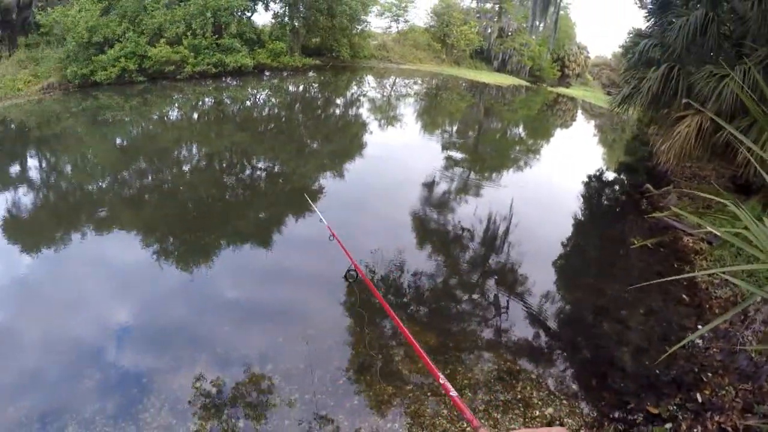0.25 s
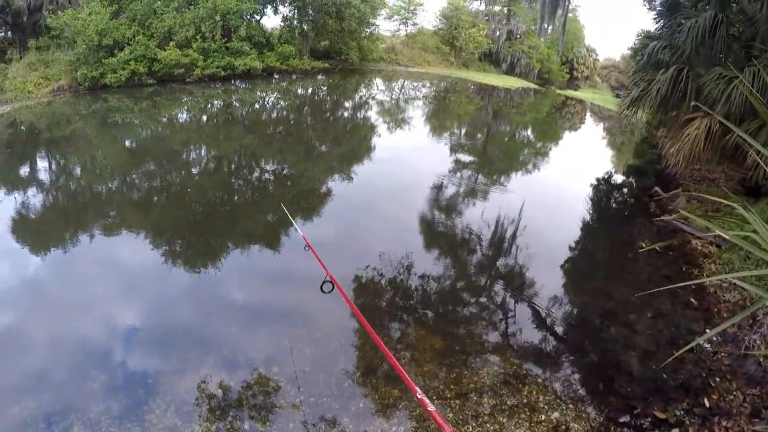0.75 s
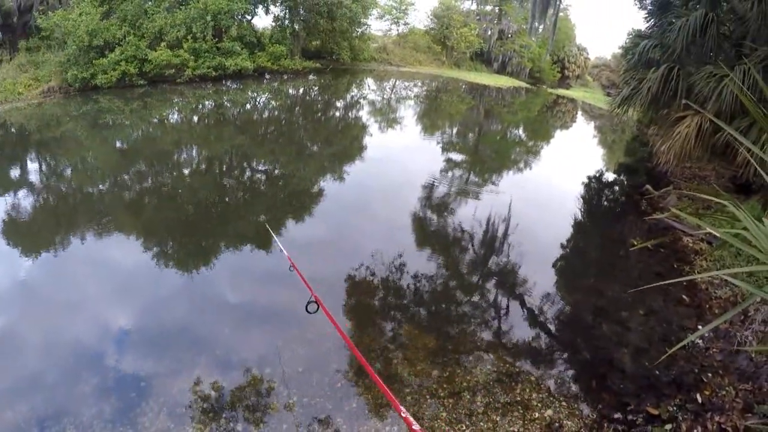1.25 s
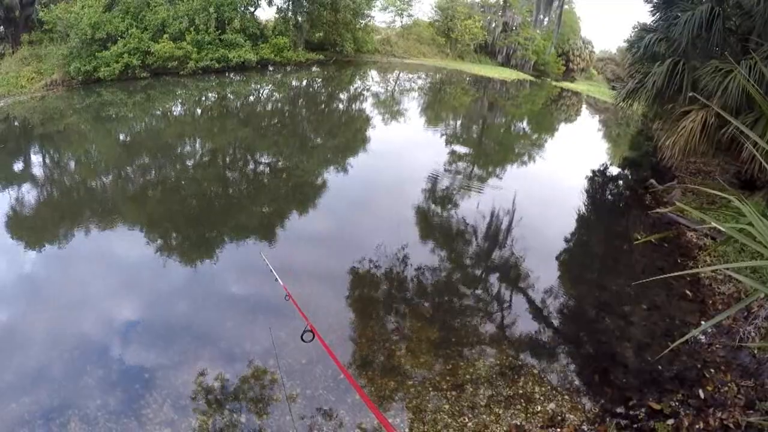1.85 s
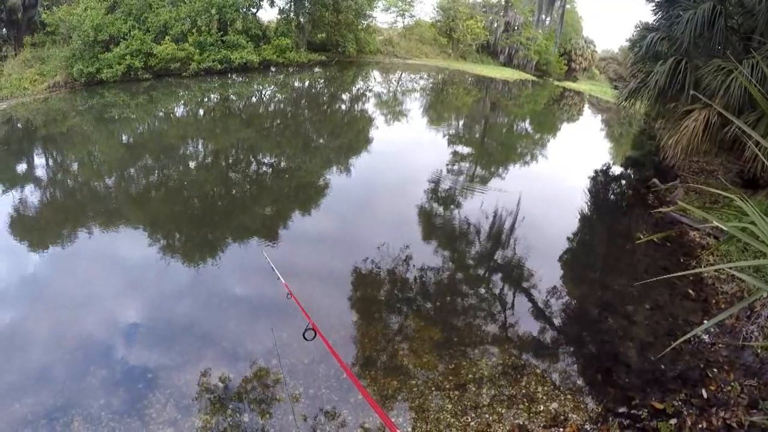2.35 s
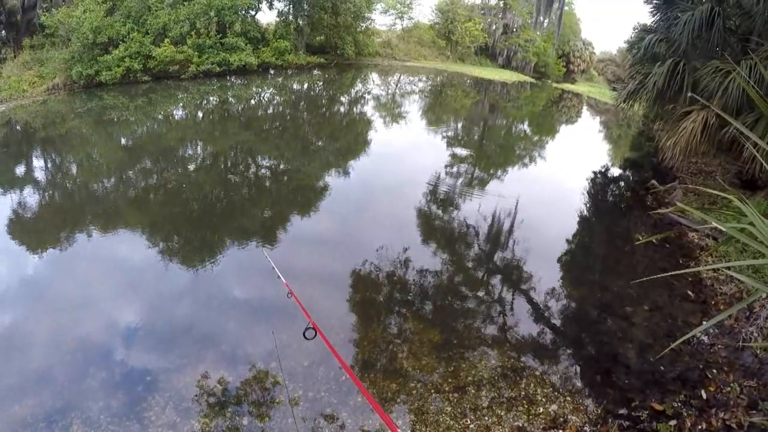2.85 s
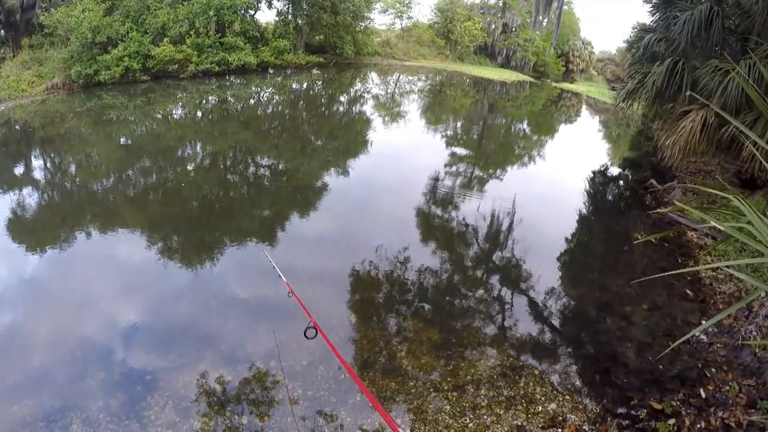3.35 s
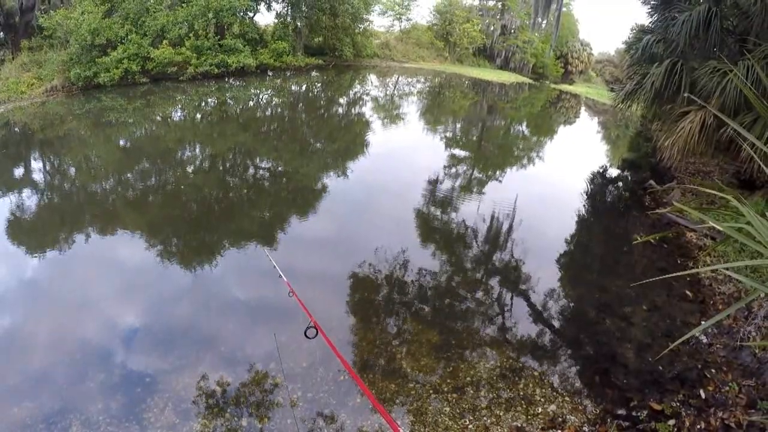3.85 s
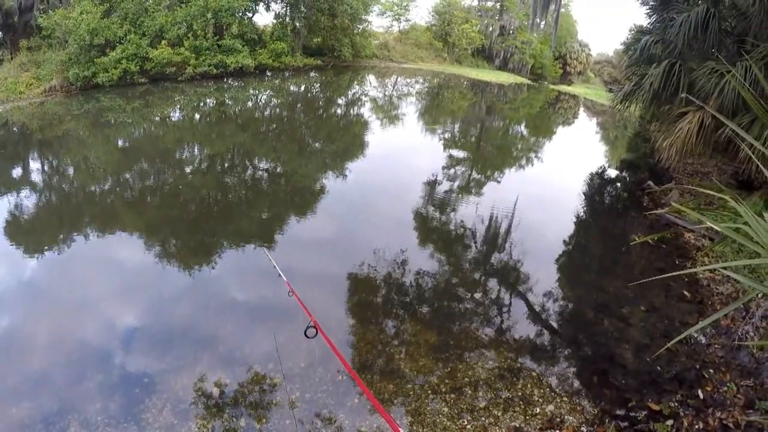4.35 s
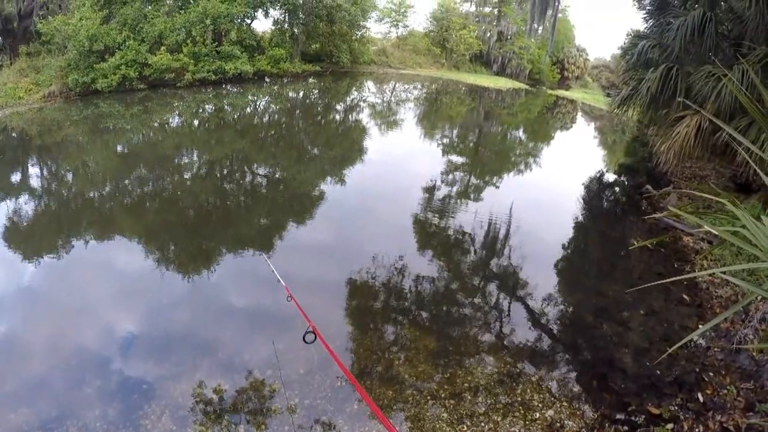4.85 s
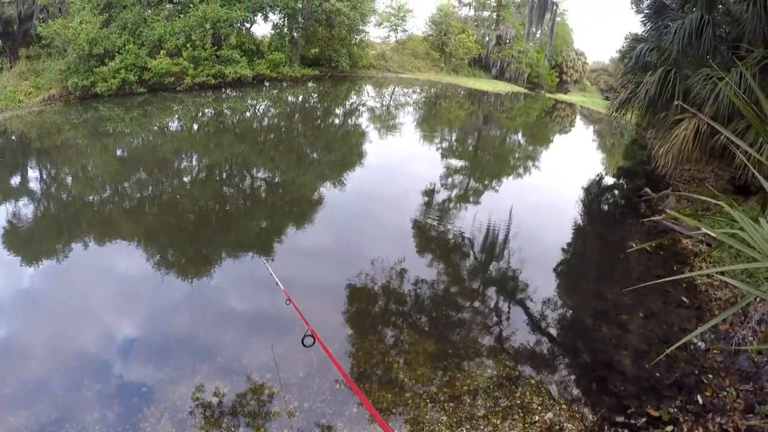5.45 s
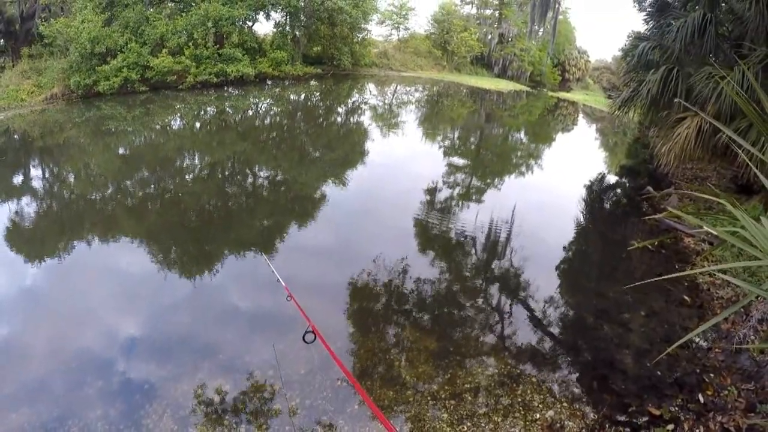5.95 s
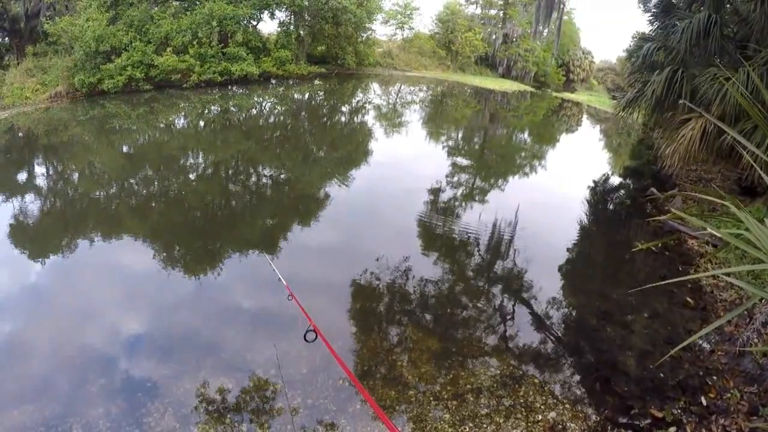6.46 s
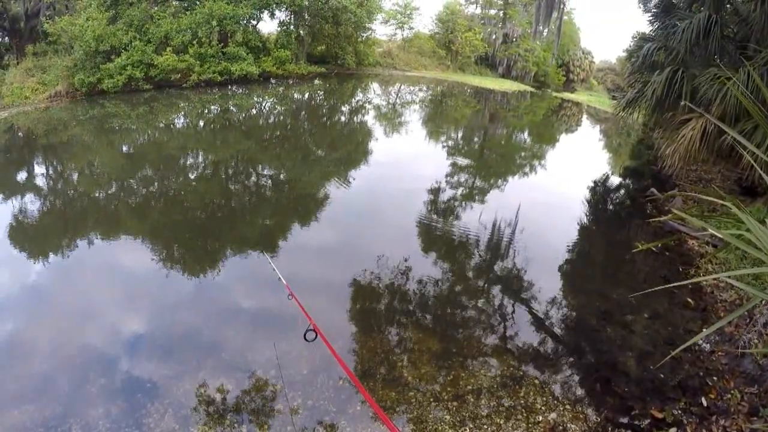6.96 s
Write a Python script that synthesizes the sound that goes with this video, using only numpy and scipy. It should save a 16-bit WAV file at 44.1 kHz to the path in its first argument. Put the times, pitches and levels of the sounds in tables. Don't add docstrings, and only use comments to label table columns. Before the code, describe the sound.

Low distant traffic rumble and a steady high cricket trill beside a pond, a rod tick early, then a small bird's falling thin whistles.

```python
import sys
import numpy as np
from scipy import signal
from scipy.io import wavfile
from scipy.ndimage import uniform_filter1d

SR = 44100
rng = np.random.default_rng(int(sys.argv[2]) if len(sys.argv) > 2 else 0)


def how_loud(loudness_db):
    steps = np.asarray(loudness_db, float) / 20
    return 10 ** steps


def store_wav(level_fs):
    pcm = np.round(np.clip(np.atleast_2d(level_fs), -1, 1) * 32767)
    wavfile.write(sys.argv[1], SR, pcm.T.astype(np.int16))


N = 317961


def read(points, hz):
    f, value = np.transpose(points)
    return np.interp(np.log(hz + 1), np.log(f + 1), value)


def evened(x):
    return x / np.sqrt(np.mean(x ** 2) + 1e-20)


def curve(rows, t):
    s, value = np.transpose(rows)
    return np.interp(t, s, value)


def add(mix, s, sound):
    part = mix[round(s * SR):][:len(sound)]
    part += sound[:len(part)]


def resonate(x, hz, width_hz):
    turn = np.exp(2j * np.pi * np.cumsum(hz * np.ones(len(x))) / SR)
    r = np.exp(-np.pi * width_hz / SR)
    for _ in range(2):
        x = 2 * (turn * signal.lfilter([1 - r], [1, -r], x / turn)).real
    return x


def wander(count, rate_hz):
    b, a = signal.butter(2, 2 * rate_hz / SR)
    settled = signal.lfilter(b, a, rng.standard_normal(count + SR))[SR:]
    return evened(settled)


def noise(spectrum, size, patchy_db):
    frames, hz = 4 * N // size + 5, np.fft.rfftfreq(size, 1 / SR)
    a, b, patches = rng.standard_normal((frames, len(hz), 3)).T
    patches = uniform_filter1d(patches, size=9, axis=0)
    patches = evened(uniform_filter1d(patches, size=9, axis=1))
    z = (a + 1j * b) * how_loud(read(spectrum, hz)[:, None] + patchy_db * patches)
    return evened(signal.istft(z, nperseg=size, noverlap=3 * size // 4)[1][:N])


# frequency in Hz, level in dB per Hz.
HISS_SPECTRUM = [(1900, -26), (3300, -10.5), (4200, -9), (5500, -10.5), (8000, -14), (13000, -18),
                 (15500, -20)]


def camera_hiss():
    return how_loud(-75.5) * noise(HISS_SPECTRUM, size=512, patchy_db=1.0)


# frequency in Hz, level in dB per Hz.
RUMBLE_SPECTRUM = [(4.7, -39), (8.0, -14), (32, 1), (54, 1.5), (77, -0.5), (200, -16), (260, -29),
                   (440, -120)]
DRONE_SPECTRUM = [(53, -19.5), (90, -1.5), (188, -6.5), (285, -15.5), (420, -23), (550, -54.5), (920, -120)]
ROAR_SPECTRUM = [(150, -10.5), (260, -1), (289, -5.5), (377, -4), (465, -3), (511, -4), (574, -3),
                 (947, -1), (1140, -6.5), (1360, -7.5), (2670, -26), (4200, -37.5), (5460, -61),
                 (9240, -120)]
# time in seconds, level in dB.
TRAFFIC_NEARNESS = [(0, -5), (1.8, -0.5), (3.6, 0.5), (4.8, -0.5), (6, 3), (7.21, 2)]
# start and end in seconds, start and end pitch in Hz, level in dB.
ENGINE_NOTES = [(0, 0.94, 79.66, 80.1, -52), (1.2, 3.17, 80, 78, -51.5), (0, 1.2, 128, 125, -55),
                (0, 0.49, 44, 82, -51.5), (0.9, 1.699, 44, 63.8, -44), (1.5, 3.6, 36, 33, -52),
                (1.5, 3.2, 64, 64.9, -46.5), (2.6, 3.5, 143, 120, -56), (4, 4.32, 186, 280, -59),
                (2.5, 4.698, 67, 28.27, -49), (4, 5.095, 65.5, 74.9, -47), (4, 5.6, 58, 47.9, -50),
                (4, 7.6, 210, 160, -55.5), (4.5, 6.4, 221.8, 214, -61.5), (5.6, 7.5, 111, 113, -51.5),
                (6.3, 7.5, 168, 169, -54.5), (6.1, 7.5, 140, 141, -57), (6, 7.5, 66, 55, -47),
                (5.5, 7, 56.2, 49.5, -46.5)]


def road(t):
    near_db = curve(TRAFFIC_NEARNESS, t)
    passing_car_db = 1.37 * np.exp(-((t - 3.5) / 3) ** 2)
    rumble_db = -41 - 0.38 * near_db
    drone_db = -50 + near_db
    roar_db = -51.5 - 0.1 * near_db + passing_car_db
    out = how_loud(rumble_db) * noise(RUMBLE_SPECTRUM, size=8192, patchy_db=1.7)
    out += how_loud(drone_db) * noise(DRONE_SPECTRUM, size=4096, patchy_db=1.16)
    out += how_loud(roar_db) * noise(ROAR_SPECTRUM, size=1024, patchy_db=.5)
    for row in ENGINE_NOTES:
        add(out, row[0], engine(*row))
    return out


def engine(start, end, start_hz, end_hz, db):
    s = np.arange(start, end, 1 / SR)
    hz = np.interp(s, [start, end], [start_hz, end_hz]) + 1.296 * wander(len(s), rate_hz=1.83)
    since_start = s - start + .25 * (start == 0)
    near = np.clip(np.minimum(since_start, end - s) / 0.27, 0, 1)
    note = np.sqrt(2) * np.sin(2 * np.pi * (np.cumsum(hz) / SR + rng.random()))
    return how_loud(db + 1.0 * wander(len(s), rate_hz=1.9)) * near * note


# pulses per second, level in dB, pitch as a factor.
SINGERS = [(32.14, -4, 1.0), (37.96, -4, .97), (45.6, -7.5, 1.03), (77, -7, .99), (56.7, -6, 1.02),
           (28.9, -7, .95)]
# time in seconds, level in dB.
CHORUS_LEVEL = [(0, -73.5), (1.3, -73.5), (3.8, -74.5), (5.1, -73.5), (6.3, -73.5), (7.21, -73)]


def crickets(t):
    wing_hz = 4748
    out = 1.5 * evened(resonate(rng.standard_normal(N), wing_hz, width_hz=450))
    for rate, singer_db, pitch in SINGERS:
        turns = np.cumsum(rate * (1 + .012 * wander(N, rate_hz=1.2))) / SR + rng.random()
        stroke = np.clip(np.cos(2 * np.pi * turns) + .3, 0, 1)
        wing = resonate(stroke * rng.standard_normal(N), wing_hz * pitch, width_hz=330)
        out += how_loud(singer_db) * evened(wing)
    return how_loud(curve(CHORUS_LEVEL, t)) * evened(out)


# start in seconds, hold in seconds, level in dB.
SLEEVE_STROKES = [
    (0, .02, -73),
    (.65, .35, -77.5),
]


def sleeve(t):
    grains = rng.standard_normal(N) * how_loud(2.6 * wander(N, rate_hz=130))
    rub = np.zeros(N)
    for s, hold, db in SLEEVE_STROKES:
        rise_db = 100 * np.maximum(s - t, 0)
        fall_db = 65 * np.maximum(t - s - hold, 0)
        rub += how_loud(db - rise_db - fall_db)
    return rub * evened(resonate(grains, 3700, width_hz=2100))


# time in seconds, peak in dB, centre in Hz, width in Hz.
ROD_TICKS = [
    (.0425, -56, 4000, 2400),
    (.154, -60, 5400, 2600),
    (.1545, -41.5, 1400, 1200),
    (.155, -56, 2500, 1400),
    (.780, -54, 3600, 2000),
]


def rod():
    out = np.zeros(N)
    count = 600
    fade = how_loud(-60 * np.arange(count) / SR / 0.012)
    for s, db, hz, width_hz in ROD_TICKS:
        blow = signal.unit_impulse(count) + .15 * rng.standard_normal(count) * fade
        snap = resonate(blow, hz, width_hz)
        add(out, s, how_loud(db) * snap / abs(snap).max())
    return out


def chip(t, held_hz, far_hz):
    hz = held_hz - (held_hz - far_hz) * np.exp(-t / .0058)
    return hz, np.interp(t / t[-1], [0, .52, 1], [-14, 0, -14])


def whistle(t, held_hz, far_hz):
    held = held_hz * (1 - .072 * np.exp(-t * held_hz / 95))
    drop = far_hz + 80000 * (t[-1] - t)
    db = np.interp(t, [0, t[-1] - .021, t[-1]], [-9, 0, -10])
    return np.minimum(held, drop), db


def slur(t, held_hz, far_hz):
    hz = held_hz + (far_hz - held_hz) * (t / t[-1]) ** 2.05
    rise_db = np.interp(t / t[-1], [0, .4], [-7, 0])
    return hz, rise_db - 2.2 * ((hz - held_hz) / 1e3) ** 2


def sing(shape, start, length, peak_db, held_hz, far_hz, jitter_hz=45, flutter_db=2.6):
    t = np.arange(0, length, 1 / SR)
    hz, db = shape(t, held_hz, far_hz)
    hz = uniform_filter1d(hz, size=70, mode="nearest") + jitter_hz * wander(len(t), rate_hz=160)
    flutter = how_loud(peak_db + db + flutter_db * wander(len(t), rate_hz=150))
    tone = np.sqrt(2) * np.sin(2 * np.pi * np.cumsum(hz) / SR)
    return start, flutter * tone * signal.windows.tukey(len(t), .1)


def wood(x):
    at = np.arange(200, SR // 2, 20)
    at += rng.integers(0, 20, len(at))
    s, taps = at / SR, np.zeros(SR // 2 + 20)
    decay_db = -60 * s / .46 + 3. * rng.standard_normal(len(at))
    taps[at] = rng.choice([-1., 1.], len(at)) * how_loud(decay_db) * (1 - np.exp(-s / 0.0031))
    return signal.fftconvolve(x, taps / np.linalg.norm(taps))[:N]


# start and length in seconds, peak in dB, held pitch in Hz, far-end pitch in Hz.
CHIP_NOTES = [
    (4.4745, .024, -59, 7560, 5700),
    (6.319, .012, -68, 6550, 5200),
]
WHISTLE_NOTES = [
    (6.051, 0.094, -65.5, 8460, 7500),
    (6.197, 0.075, -60, 8160, 6300),
]
SLUR_NOTES = [
    (6.325, .063, -59.5, 6370, 5670),
    (6.428, .044, -59, 5690, 3670),
]
HOARSE_NOTES = [
    (6.503, .102, -70.5, 4330, 3300),
    (6.642, .086, -73.5, 4390, 4250),
]
SECOND_VOICE = [
    (6.52, .06, -81, 3250, 3450),
    (6.638, .034, -75, 3770, 3330),
    (6.683, .03, -74, 3970, 3480),
    (6.708, .016, -79, 3550, 3850),
]
HIDDEN_NOTES = [
    (3.321, .026, -68, 7250, 8330),
    (3.345, .03, -75, 7330, 7200),
    (4.75, .5, -81, 3000, 3020),
]
# delay in seconds, level in dB.
NEAR_BOUNCES = [(.003, -9), (.007, -12), (.0125, -13), (.021, -15)]


def bird():
    clear = [sing(chip, *row) for row in CHIP_NOTES]
    clear += [sing(whistle, *row) for row in WHISTLE_NOTES]
    clear += [sing(slur, *row) for row in SLUR_NOTES]
    clear += [sing(whistle, *row, jitter_hz=85, flutter_db=3.6) for row in HOARSE_NOTES]
    clear += [sing(slur, *row, jitter_hz=85, flutter_db=3.6) for row in SECOND_VOICE]
    hidden = [sing(slur, *row) for row in HIDDEN_NOTES]
    direct, sung = np.zeros(N), np.zeros(N)
    for notes, direct_share in [(clear, .87), (hidden, .25)]:
        for start, note in notes:
            add(direct, start, direct_share * note)
            for late, bounce_db in NEAR_BOUNCES:
                add(direct, start + late, how_loud(bounce_db) * note)
            add(sung, start, note)
    return direct + how_loud(-5.5) * wood(sung)


def scene():
    t = np.arange(N) / SR
    return (road(t) + crickets(t) + sleeve(t) + rod() + bird())[None]


DULL_MOMENTS = [.881, 2.716, 3.14, 6.216, 6.94]


def dulled(x):
    t = np.arange(N) / SR
    top = signal.oaconvolve(x, signal.firwin(255, 12900, pass_zero=False, fs=SR)[None], "same")
    missing = sum(1. * ((t > s) & (t < s + .037)) for s in DULL_MOMENTS)
    return x - uniform_filter1d(missing, size=90) * top


def band_limit(x):
    return signal.sosfilt(signal.butter(12, 15290, fs=SR, output="sos"), x)


def record(dry):
    x = dulled(dry + camera_hiss())
    mix = np.tanh(x / 0.084) * 0.086
    return band_limit(mix)


dry = scene()
out = record(dry)
store_wav(out)
```